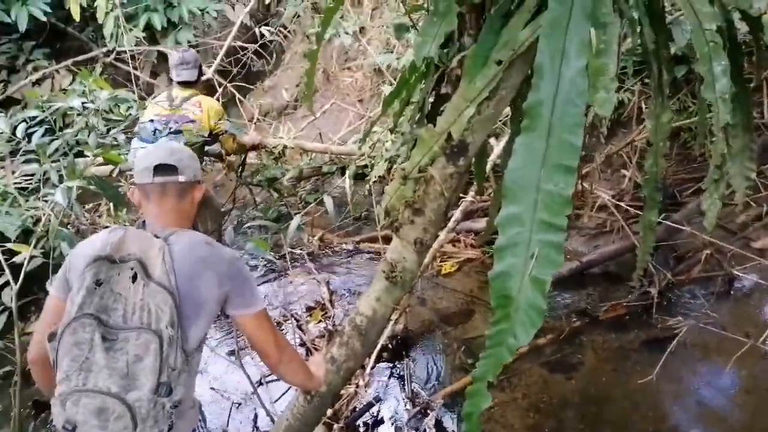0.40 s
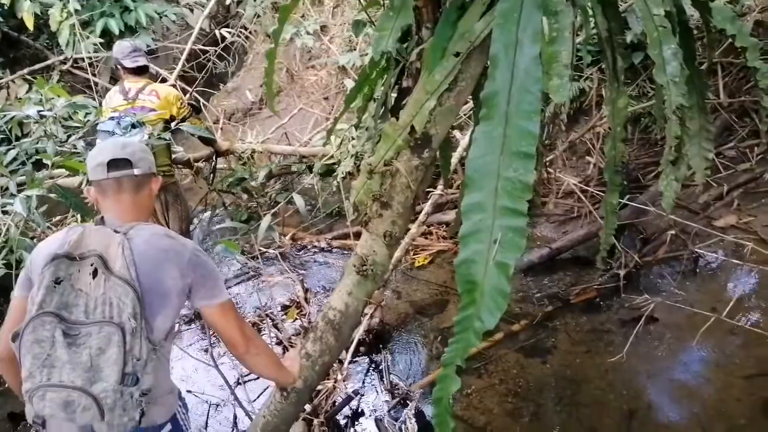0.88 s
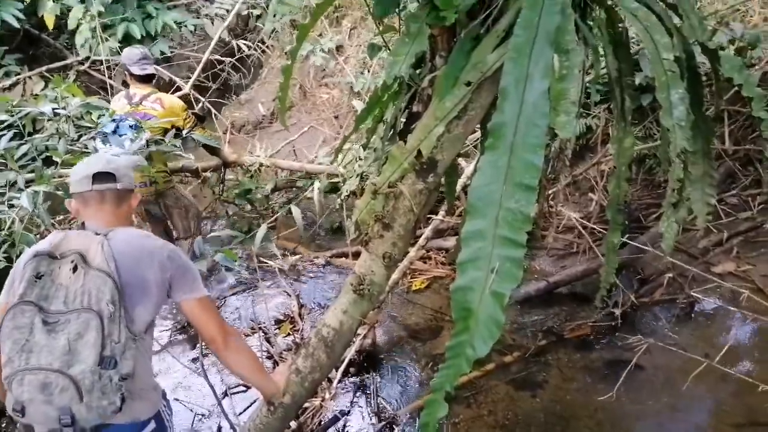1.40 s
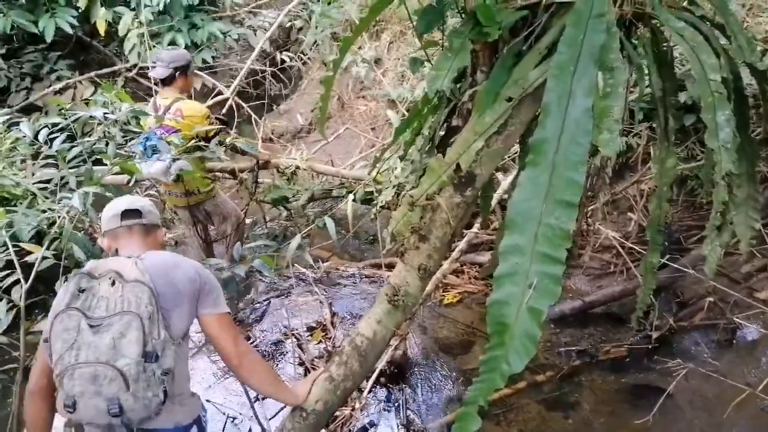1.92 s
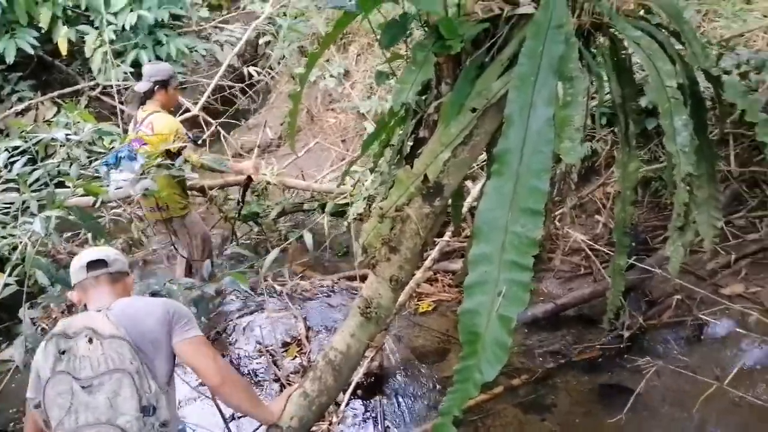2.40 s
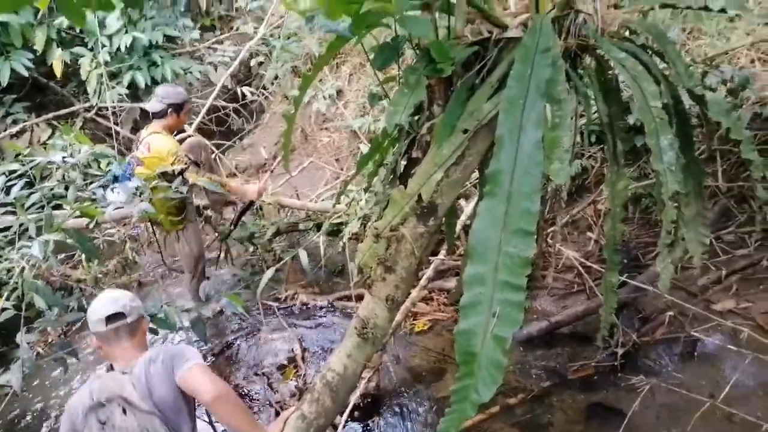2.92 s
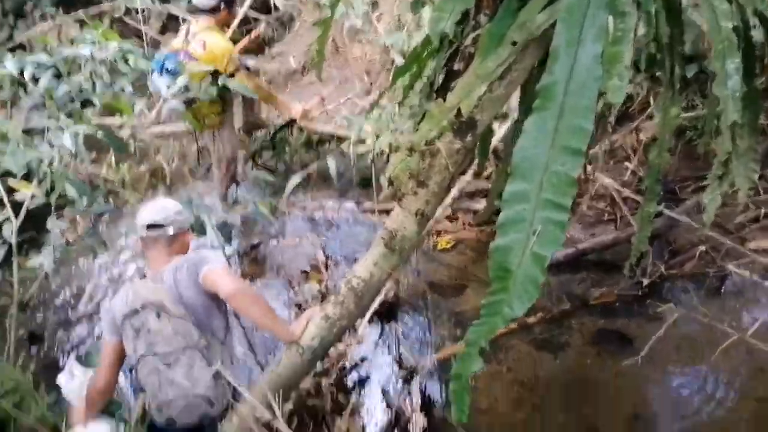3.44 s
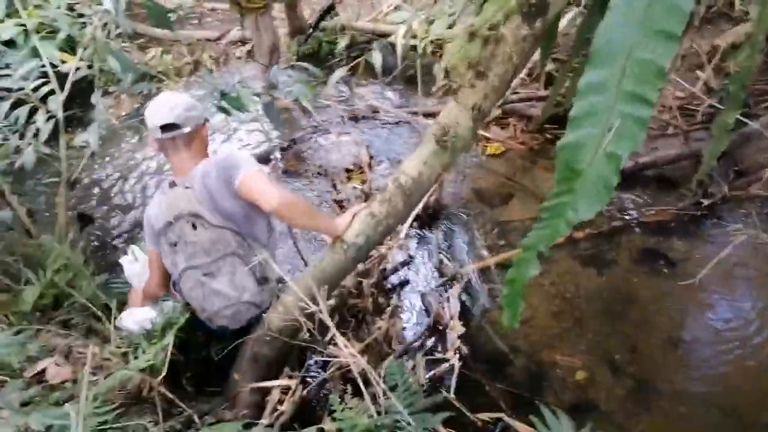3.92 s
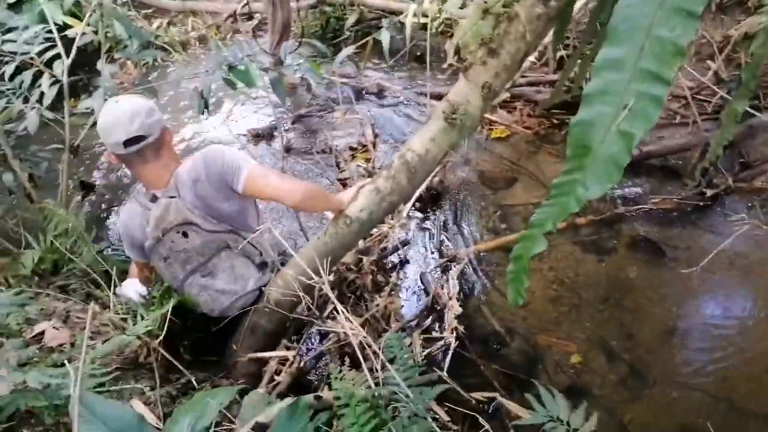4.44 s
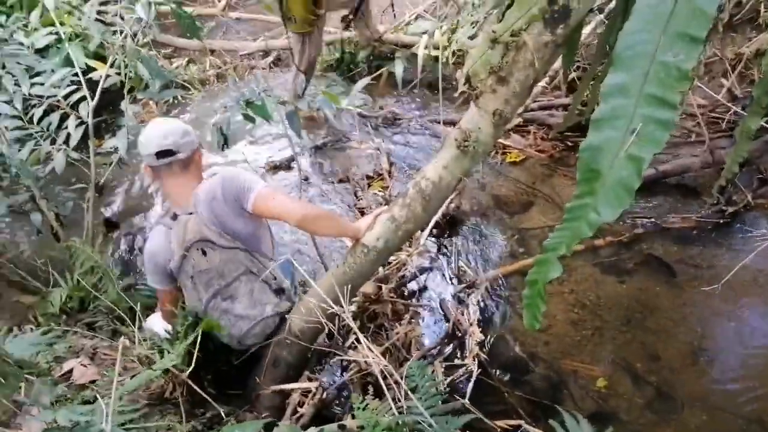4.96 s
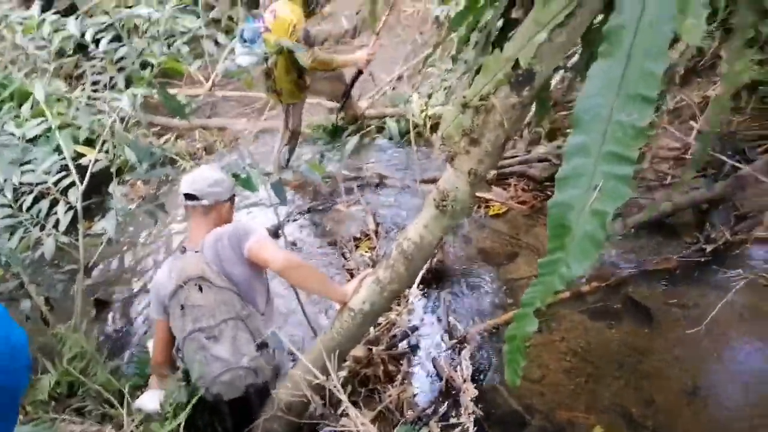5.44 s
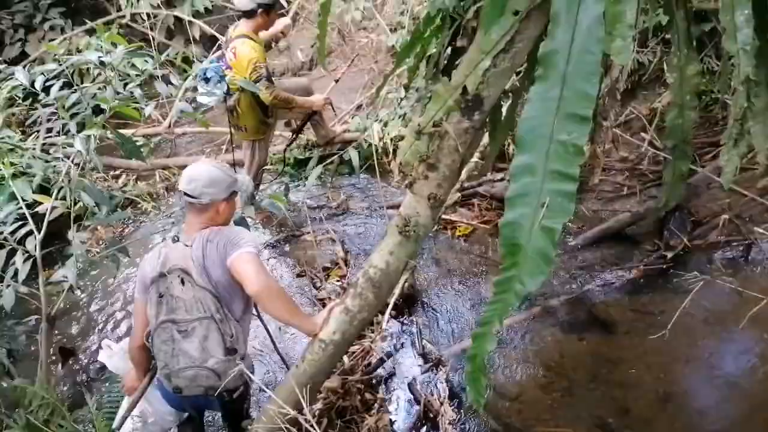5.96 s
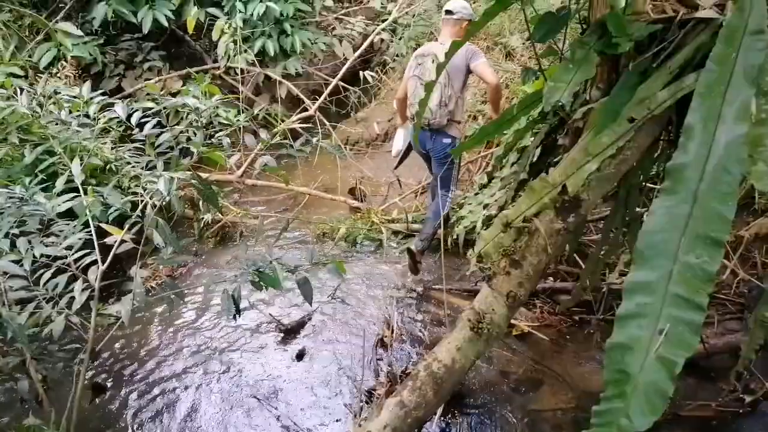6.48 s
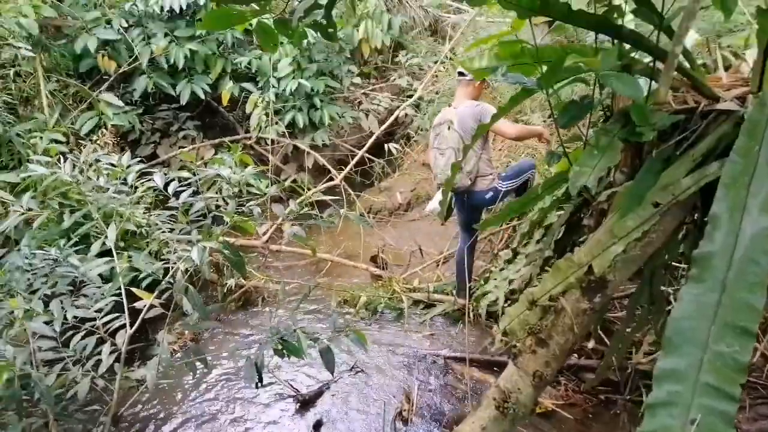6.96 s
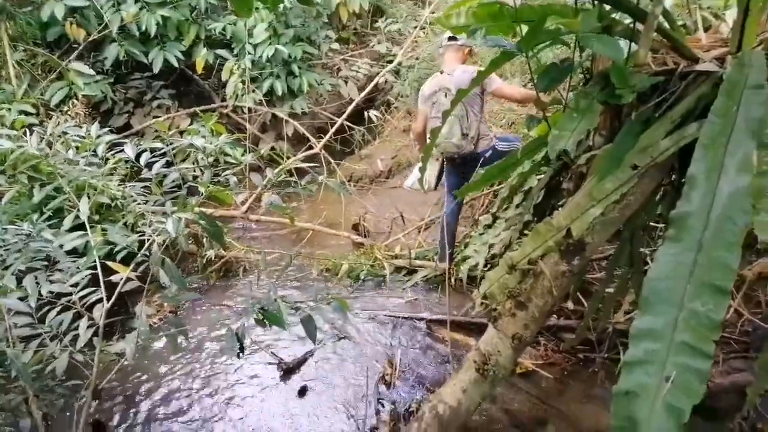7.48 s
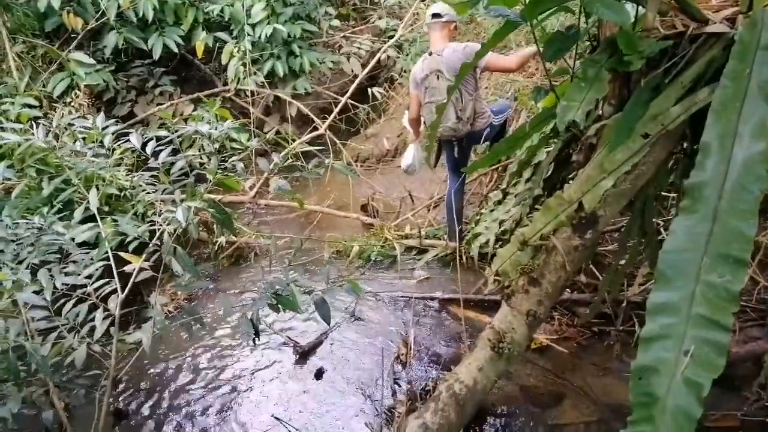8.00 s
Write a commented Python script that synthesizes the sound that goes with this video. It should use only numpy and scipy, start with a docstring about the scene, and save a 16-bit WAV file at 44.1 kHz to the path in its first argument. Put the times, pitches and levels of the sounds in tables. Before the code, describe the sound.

Irregular crunching, cracking sticks and rustling leaves over small watery gurgles and faint stream hiss, shifting abruptly to another spot near the end.

```python
"""A twig snaps almost at once, then people push through brush beside a shallow forest stream.
Sticks crack, ring and splinter as noise; dry leaves crackle in dense grains; ringing air pockets make bubbles;
steps knock as short low rings on soft ground. A two-port handheld microphone hears it, with a short noise tail
scattered by trunks and foliage and a faint hiss of far water and air.
Late on, a cut with a short dip joins a second place: near sounds are further left, in another colour."""
import sys
import numpy as np
from scipy import signal
from scipy.fft import rfft, irfft, next_fast_len
from scipy.io import wavfile
from scipy.ndimage import uniform_filter1d

SR = 44100
rng = np.random.default_rng(int(sys.argv[2]) if len(sys.argv) > 2 else 0)


def linear_from_db(decibels):
    """Turn decibels (scalar or array-like) into linear amplitude factors; 0 gives 1."""
    return 10 ** (np.asarray(decibels, float) / 20)


def materialize(psi):
    """Save the field psi as 16-bit PCM at rate SR to the path in sys.argv[1].

    A 1-D psi becomes a single channel; in a 2-D psi each row is a channel.
    """
    bounded = np.clip(np.atleast_2d(psi).T, -1, 1)
    quanta = np.round(bounded * 32767).astype(np.int16)
    wavfile.write(sys.argv[1], SR, quanta)


N = 357651  # samples
T = np.arange(N) / SR  # s
HZ = np.fft.rfftfreq(next_fast_len(N + SR), 1 / SR)

# far water and air: (frequency [Hz], level per Hz [dB])
HISS_COLOUR = [(20, -3.5), (48, -5.5), (178, -4), (359, -13), (598, -9.5), (5580, -11), (15500, -20.5)]
# how alike the far hiss is at the two ports: (frequency [Hz], likeness [0-1])
HISS_LIKENESS = [(30, 0), (60, 0.99), (240, 0.13)]
# scatter from trunks and foliage: (frequency [Hz], time to fall 60 dB [s])
FOREST_DECAY = [(300, 0.26), (1500, 0.14), (4500, 0.32), (12000, 0.4)]
# spray above the bubbles: (time [s], level [dB])
SPRAY_LEVEL = [(.15, -61), (.3, -56), (.8, -53.5), (.95, -73), (2.45, -68), (2.56, -59.5), (2.95, -50),
               (3.2, -94), (4.7, -82), (5.05, -66), (5.5, -75)]
# larger bubbles and drips, and one high narrow tick: (time [s], level [dB], pitch [Hz])
BUBBLES = [(0.269, -40, 980), (0.294, -41, 875), (0.326, -44, 920), (0.392, -45, 880), (0.476, -39, 900),
           (0.497, -36, 3140), (0.646, -48, 356), (0.648, -41.5, 840), (1.24, -54, 560),
           (1.382, -46.5, 557), (1.928, -43.5, 540), (2.929, -42.5, 266), (3.162, -47, 367),
           (3.948, -44, 816), (4.85, -42, 945), (4.91, -38.5, 1250), (5.19, -35, 980), (0.954, -33.5, 1154),
           (5.065, -37, 346), (6.27, -43, 1100), (6.47, -44.5, 850), ]
# wading: (time [s], small bubbles level [dB], large bubbles relative to small [dB])
WADING = [(.1, -67.5, -1.5), (.3, -52.5, -14.5), (.7, -57.5, -6), (1.1, -71, -4), (2.46, -66, -6),
          (2.6, -54.5, -8.5), (3, -66, 0), (3.25, -60.5, 1.5), (3.7, -59.5, -9.5), (4.1, -68, -3),
          (4.65, -68.5, -9), (5.0, -51, -12.5), (5.25, -53.5, -10), (5.6, -67.5, -1), (6, -60, -2),
          (6.88, -67.5, -9.5), (6.95, -59, -2.5), (7.25, -59.5, 0.5), (7.5, -81, 8), (7.8, -58.5, -5.5),
          (8.11, -71.5, -11)]
# knocks of heel and stick on soft ground: (time [s], level [dB], pitch [Hz])
THUDS = [(0.192, -36, 346), (1.369, -43, 200), (1.9153, -34.5, 228), (2.897, -31, 426), (2.93, -43, 85),
         (3.356, -30.5, 383), (3.425, -30.5, 444), (3.47, -39, 85), (5.051, -38, 85), (5.877, -34, 280),
         (5.8907, -30.5, 323), (5.909, -33, 295), (6.231, -34, 460), (7.718, -35, 332)]
# short damped ticks, from twigs, knocks or drips: (time [s], level [dB], resonance [Hz])
TICKS = [(2.1266, -27, 4750), (3.354, -36, 2440), (5.851, -38, 3120), (5.875, -33, 3140),
         (5.8904, -30, 2490), (5.8893, -35, 1080), (5.907, -33, 1100), (6.047, -39, 2900),
         (6.432, -38, 970), (6.486, -37, 1470), (6.851, -37, 5050)]
# pushing through: (time [s], leaves level [dB], crisp relative to leaves [dB])
LEAVES = [(0, -48, -0.5), (.15, -56, -7), (.55, -49, -9.5), (.9, -60, -3), (1.4, -56.5, -2),
          (2.47, -60, -3.5), (2.54, -48, -10.5), (2.7, -53.5, -4), (2.95, -50, -2), (3.3, -54, -4.5),
          (3.72, -46.5, -6), (3.95, -58, -4.5), (4.65, -63, -6), (5.2, -43, -11), (5.5, -59, -9),
          (5.92, -50, -6), (6.39, -58.5, -2), (6.8, -64.5, -7), (6.95, -54.5, 4.5), (7.08, -50.5, 3),
          (7.27, -67, -16), (7.5, -104, -19), (7.66, -61.5, -6), (7.8, -52.5, 1.5), (8.11, -65, -2)]
# snaps: (time [s], level [dB], woody share [dB], crisp share [dB], nominal splintering time [s])
SNAPS = [(0.023, -20.5, -10, -1, 0.031), (0.194, -41, -0.5, -9.5, 0.061), (0.403, -33, -6.5, -2.5, 0.27),
         (0.8722, -31, -7, -6.5, 0.22), (0.904, -30, -10, -4.5, 0.32), (0.969, -30, -11, -0.5, 0.39),
         (0.996, -28, -5, -8, 0.13), (1.461, -29, -7, -4.5, 0.32), (2.582, -46.5, -15, 4, 0.17),
         (2.6853, -31.5, -18, 4, 0.31), (2.721, -31.5, -13, -15, 0.17), (2.8276, -30.5, -1.5, -10, 0.31),
         (2.89, -35, 1.5, -6, 0.61), (3.4186, -26.5, -2, -0.5, 0.27), (3.4272, -17, -5, -6, 0.27),
         (3.479, -24, 1.5, -5.5, 0.39), (3.547, -28.5, -6.5, -5, 0.15), (3.561, -18, -6.5, -11, 0.14),
         (3.5888, -23.5, -5.5, -3.5, 0.31), (3.637, -29.5, -8.5, -4.5, 0.071),
         (3.717, -33.5, -10.5, -1.5, 0.77), (3.839, -43, -2.5, 4.5, 0.14), (4.505, -44, 3, -12, 0.18),
         (4.7458, -54.5, 5, -1, 0.07), (5.058, -32.5, -1.5, 0.5, 0.4), (5.0687, -26.5, -14, -4, 0.28),
         (5.0893, -21, -8, -13, 0.26), (5.113, -31.5, -10, 1.5, 0.85), (5.231, -31, -8.5, -0.5, 0.035),
         (5.308, -36, -8, -3, 0.58), (5.4151, -41, 2.5, -23, 0.029), (6.161, -40, -7, -4, 0.99),
         (6.224, -28.5, -1.5, -2.5, 0.4), (7.218, -43.5, 3, 1.5, 1), (7.288, -22.5, -6, -2.5, 0.22),
         (7.401, -39, -8, 5.5, 0.2), (7.7148, -43.5, -2.5, -24, 0.34)]
# modes of a typical stick, woody first, crisp last: (pitch [Hz], level [dB], time to fall 60 dB [s])
STICK_MODES = [(1100, -11, 0.053), (2610, -5, 0.015), (3510, -6.5, 0.032), (5350, -12.5, 0.042)]
# bands of the crackle, in order thump, wood, leaf and crisp: (low edge [Hz], high edge [Hz])
CRACKLE_BANDS = [(70, 650), (650, 1600), (1600, 5500), (5500, 16000)]
# microphone colour on crackle: (frequency [Hz], level per Hz [dB])
PORT_COLOUR = [(40, -13), (342, 7), (535, -2.5), (637, -16.5), (838, -9), (1520, -8.5), (2510, -1),
               (5200, -8), (8400, -16), (10000, -13.5), (14000, -24.5), (15600, -37)]
# how alike close noise and scatter are at the two ports: (frequency [Hz], likeness [0-1])
LIKENESS = [(60, 0.99), (200, 1), (600, 0.89), (1300, 0.38), (3000, 0.2), (9000, 0.013)]
# colour of the near sounds after the cut: (frequency [Hz], gain [dB])
AFTER_CUT_COLOUR = [(100, -15), (400, -3), (1050, -2.5), (1500, -5.5), (2800, 2.5), (5200, 3), (9000, -1.5),
                    (15000, 0.5)]
# level difference of the ports: (frequency [Hz], left minus right [dB])
SIDES = [(60, -2.5), (150, 0.5), (640, 1), (1410, -4.5), (3100, -6), (6820, -7), (15000, 5)]
# phase difference of the ports: (frequency [Hz], left ahead of right [radians])
LEFT_LEADS = [(60, .4), (950, .7), (1550, 3.1), (2150, 3.3), (2600, 5.4), (15000, 21)]

CUT_S = 6.406  # a cut joins two places here


def evened(x):
    """Scales to unit rms."""
    return x / np.sqrt(np.mean(x ** 2) + 1e-20)


def read(points, hz):
    """Reads a table on a log-frequency axis."""
    f, value = np.transpose(points)
    return np.interp(np.log(hz + 1), np.log(f + 1), value)


def add(mix, s, sound):
    """Adds a sound at a time in seconds."""
    part = mix[..., round(s * SR):][..., :sound.shape[-1]]
    part += sound[..., :part.shape[-1]]


def shaped(x, gain):
    """Filters by a gain given on the frequency grid."""
    return irfft(rfft(x, 2 * len(HZ) - 2) * gain)[..., :N]


def at_ports(a, b, likeness):
    """Left hears a; right hears it blended with the unrelated b."""
    same = np.clip(read(likeness, HZ), 0, .99)
    right = shaped(a, same) + shaped(b, np.sqrt(1 - same ** 2))
    return np.array([a, right])


def dying(t60, rise_s):
    """An envelope: quick rise, then exponential decay."""
    t = np.arange(SR // 2) / SR
    return (1 - np.exp(-t / rise_s)) * linear_from_db(-60 * t / t60)


def ring(hz, t60):
    """A damped mode."""
    t = np.arange(SR // 4) / SR
    return np.sin(2 * np.pi * hz * t) * linear_from_db(-60 * t / t60)


def crackle(per_s, spread_db):
    """Tiny breaks of uneven size at both ports, split into the four bands at unit level."""
    size_db = spread_db * np.minimum(rng.exponential(1, (2, N)), 4)
    breaks = linear_from_db(size_db) * rng.standard_normal((2, N))
    a, b = breaks * (rng.random((2, N)) < per_s / SR)
    pair = shaped(at_ports(a, b, LIKENESS), linear_from_db(read(PORT_COLOUR, HZ)))
    bands = []
    for edges in CRACKLE_BANDS:
        sos = signal.butter(3, edges, "band", fs=SR, output="sos")
        bands.append(evened(signal.sosfilt(sos, pair)))
    return bands


def patchy(x, depth_db):
    """Different leaves answer by turns: the colour drifts in patches of time and frequency."""
    z = signal.stft(x, nperseg=512)[2]
    field = uniform_filter1d(rng.standard_normal(z.shape[1:]), size=7, axis=0)
    field = evened(uniform_filter1d(field, size=12, axis=1))
    return signal.istft(z * linear_from_db(depth_db * field), nperseg=512)[1][:, :N]


def pushed(rows, low, high, clump_db, clump_s):
    """Two textures under one effort curve, arriving in clumps."""
    s, db, share_db = np.transpose(rows)
    clumps = evened(uniform_filter1d(rng.standard_normal(N), round(clump_s * SR)))
    effort = linear_from_db(np.interp(T, s, db) + clump_db * clumps)
    return effort * (low + linear_from_db(np.interp(T, s, share_db)) * high)


def hiss():
    """Far water and air: steady coloured noise, mostly unlike at the two ports."""
    a, b = rng.standard_normal((2, N))
    pair = at_ports(a, b, HISS_LIKENESS)
    return linear_from_db(-59) * evened(shaped(pair, linear_from_db(read(HISS_COLOUR, HZ))))


def forest(x):
    """Scatter from trunks and foliage: three alternating tails, each band dying at its own speed."""
    out = np.zeros((2, N))
    for k in range(3):
        hz, t, z = signal.stft(rng.standard_normal((2, SR // 2)), SR, nperseg=256)
        same = np.clip(read(LIKENESS, hz), 0, .99)[:, None]  # long waves reach both ports alike
        z = np.array([z[0], same * z[0] + np.sqrt(1 - same ** 2) * z[1]])
        decay = linear_from_db(-60 * t / read(FOREST_DECAY, hz)[:, None])
        tail = signal.istft(z * decay, SR, nperseg=256)[1]
        tail *= 1 - np.exp(-np.arange(tail.shape[1]) / SR / 0.0056)  # soft onset
        tail /= np.linalg.norm(tail[0])
        # the squares of the three windows add up to one
        window = np.sqrt(2 / 3) * np.cos(2 * np.pi * (3.1 * T + k / 6))
        out += signal.oaconvolve(x * window, tail, axes=1)[:, :N]
    return out


def spray():
    """Fine drops fall back in an uneven rush: band noise under a level curve."""
    a, b = rng.standard_normal((2, N))
    band = 1 / (1 + (1250 / (HZ + 1)) ** 6) / (1 + (HZ / 2500) ** 6)
    rush = evened(shaped(at_ports(a, b, LIKENESS), band))
    return linear_from_db(np.interp(T, *np.transpose(SPRAY_LEVEL))) * rush


def bubble(hz, cycles, glide):
    """A pocket of air swells and rings, its pitch rising as it nears the surface."""
    t = np.arange(SR // 8) / SR
    u = 4.06 * t * hz / max(cycles, 1)  # the ring is loudest at u = 1
    return u * np.exp(1 - u) * np.sin(2 * np.pi * hz * t * (1 + glide * u))


def gurgle(lo_hz, hi_hz, per_s, spread_db):
    """Random bubbles of one size range, at unit level."""
    out = np.zeros(N)
    for hz in np.geomspace(lo_hz, hi_hz, num=12):
        size = linear_from_db(spread_db * np.minimum(rng.exponential(1, N), 3))
        births = size * (rng.random(N) < per_s / 12 / SR)
        out += signal.oaconvolve(births, bubble(hz, 4.1, glide=0.038))[:N]
    return evened(out)


def scuff():
    """Legs stir the shallows: bubbles of two sizes over a soft slosh of crackle."""
    wading = T < CUT_S  # after the cut the steps are no longer in water and only brush along
    low, mid = crackle(per_s=6500, spread_db=3.5)[:2]
    small = wading * gurgle(lo_hz=708, hi_hz=1650, per_s=500, spread_db=1.0) + 1.2 * mid
    large = wading * gurgle(lo_hz=219, hi_hz=575, per_s=350, spread_db=4.5) + 1.45 * low
    return pushed(WADING, small, large, clump_db=2.5, clump_s=0.04)


def drips():
    """Bubbles, drips and one high tick stand out as gliding rings, each with three weaker followers."""
    out = np.zeros((2, N))
    follow_s, follow_db, pitch_spread = 0.03, -5, 0.12  # longest delay, level, log-pitch range
    for (s, db, hz), chance in zip(BUBBLES, rng.random((len(BUBBLES), 3, 2))):
        cycles = 7 * (hz / 700) ** 0.96  # higher rings last for more cycles
        add(out, s - .002, linear_from_db(db) * bubble(hz, cycles, glide=0.013))
        # up to 500 Hz all three followers start together, at one lower pitch
        for late, size in chance * (hz > 500):
            follow_hz = hz * np.exp(pitch_spread * (2 * size - 1))
            follower = bubble(follow_hz, cycles, glide=0.014)
            add(out, s + follow_s * late, linear_from_db(db + follow_db) * follower)
    return out


def thuds():
    """A step's short low push with a hard front edge and a puff of loose earth."""
    level, pushes = np.zeros(N), np.zeros((2, N))
    for s, db, hz in THUDS:
        t60 = 3.5 / hz  # heavier steps push deeper and longer
        add(level, s, linear_from_db(db) * dying(2.1 * t60, rise_s=0.00064))
        push = ring(hz, t60)
        edge = 1.4 * ring(2.95 * hz, 0.19 * t60)
        add(pushes, s - .001, linear_from_db(db) * (push + edge))
    puff = linear_from_db(-7) * level * crackle(per_s=2700, spread_db=-2.0)[0]
    return shaped(puff + pushes, 1 / (1 + (55 / (HZ + 1)) ** 4))  # soft ground gives little deep bass


def ticks():
    """Short damped ticks, from twigs, knocks or drips: a spit of noise through one broad resonance."""
    out = np.zeros((2, N))
    for (s, db, hz), noise in zip(TICKS, rng.standard_normal((len(TICKS), SR // 2))):
        spit = noise * dying(0.018, rise_s=0.00028)
        spit[0] += 3  # a sharp front
        tick = signal.lfilter(*signal.iirpeak(hz, 6, fs=SR), spit)
        add(out, s - .0005, linear_from_db(db) * tick / abs(tick).max())
    return out


def leaves():
    """Dry leaves crush and brush in dense grains."""
    leaf, crisp = crackle(per_s=5000, spread_db=-3.5)[2:]
    return patchy(pushed(LEAVES, leaf, crisp, clump_db=2.6, clump_s=.02), depth_db=1.7)


def snaps():
    """A crack, the stick's brief ring, then splinters that thin out; wood dies sooner than leaf."""
    power, rings = np.zeros((3, N)), np.zeros((2, N))
    bunches = evened(uniform_filter1d(rng.standard_normal(N + SR), size=260))
    fibres = linear_from_db(3.5 * bunches)  # fibres part in bunches
    pitch_spread, level_spread_db = 0.0986, 2  # sticks differ in size and in which mode speaks
    chances = rng.standard_normal((len(SNAPS), 2, len(STICK_MODES)))
    for (s, db, woody_db, crisp_db, t60), chance in zip(SNAPS, chances):
        t60 = np.clip(t60, .03, .9)
        heard = round((CUT_S - s) % N * SR)  # earlier splinters end at the cut
        crack = dying(0.072, rise_s=0.0058 * t60)  # long crunches give way slowly, short ones at once
        parting = linear_from_db(-5.0) * fibres[round(s * SR):][:SR // 2]
        for band, (share_db, lasting) in enumerate([(woody_db, .6), (0, 1), (crisp_db, .9)]):
            burst = crack + parting * dying(lasting * t60, rise_s=0.02 * t60)
            add(power[band], s - .001, (linear_from_db(db + share_db) * burst[:heard]) ** 2)
        shares = [woody_db, 0, 0, crisp_db]
        for (hz, mode_db, ring_t60), share_db, size, odd in zip(STICK_MODES, shares, *chance):
            level = linear_from_db(db + mode_db + share_db + level_spread_db * odd)
            add(rings, s, level * ring(hz * np.exp(pitch_spread * size), ring_t60))
    bands = crackle(per_s=14000, spread_db=1.0)[1:]
    splinters = sum(np.sqrt(p) * band for p, band in zip(power, bands))
    ringing = shaped(rings, 1 / (1 + (600 / (HZ + 1)) ** 4))
    return linear_from_db(-2.5) * patchy(splinters, depth_db=0.5) + ringing


def second_place(near):
    """After the cut, another place is heard: near sounds are further left, in another colour."""
    after = T > CUT_S
    near = near * linear_from_db(np.array([[1.3], [-1.3]]) * after)
    later = np.exp(-1j * np.pi * HZ * 0.000208)  # left lags by this many s, half on each port
    moved = shaped(near, linear_from_db(read(AFTER_CUT_COLOUR, HZ)) * [later, 1 / later])
    return np.where(after, moved, near)


def scene():
    """Movement in brush and water, its scatter, and the hiss behind; the level dips at the cut."""
    close = ticks() + thuds() + drips()
    brush = snaps() + leaves() + scuff() + spray()
    scatter = linear_from_db(-5.0) * forest(brush + .5 * close)  # small sounds nearby stir the forest less
    near = second_place(brush + close + scatter)
    dip = 1 - .85 * np.exp(-((T - CUT_S) / .004) ** 2)
    return dip * (near + hiss())


def top_cut(x):
    """Nothing passes above the cut-off."""
    return signal.sosfilt(signal.butter(12, 15980, fs=SR, output="sos"), x)


def record(dry):
    """The microphone's two ports differ in colour and in phase."""
    side_db = read(SIDES, HZ) / 2
    lead = np.exp(.5j * np.interp(HZ, *np.transpose(LEFT_LEADS)))
    ports = linear_from_db(-2.5 + np.array([side_db, -side_db])) * [lead, 1 / lead]
    return top_cut(shaped(dry, ports))


dry = scene()
out = record(dry)
materialize(out)
```